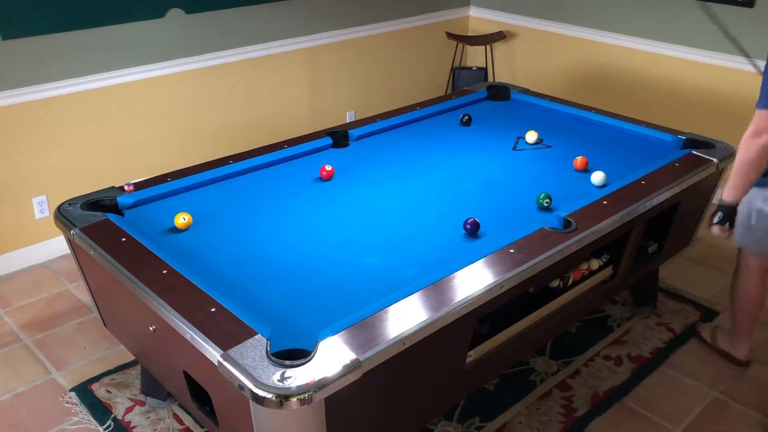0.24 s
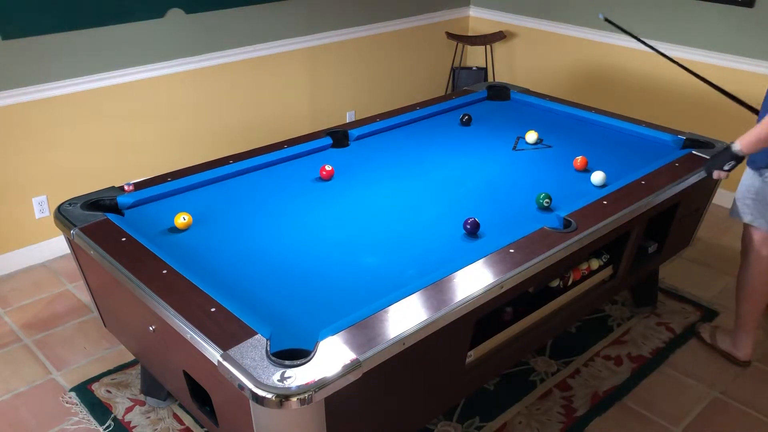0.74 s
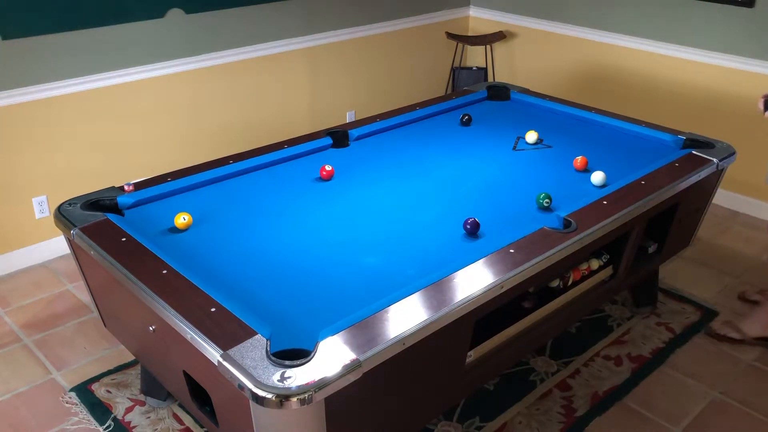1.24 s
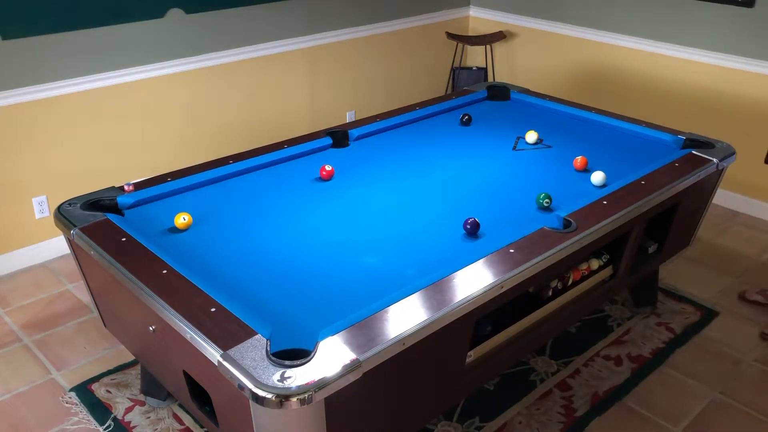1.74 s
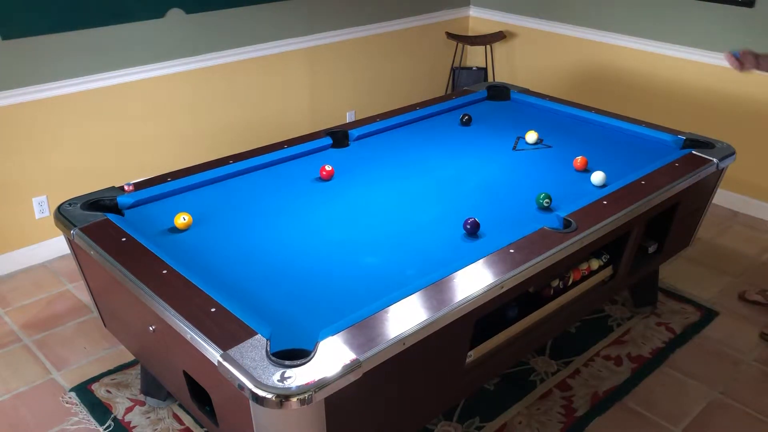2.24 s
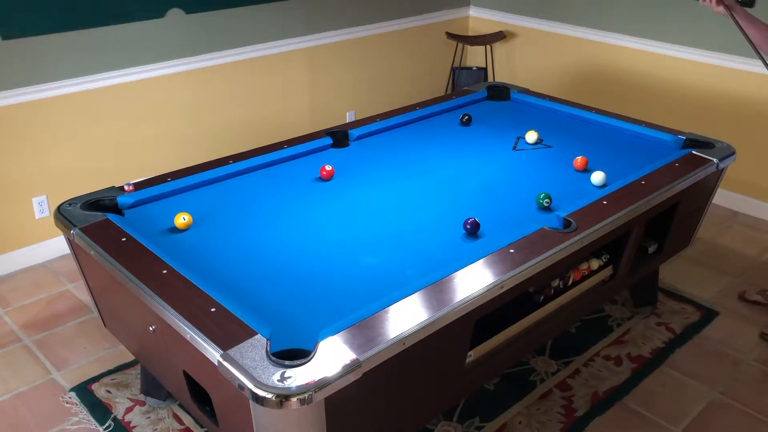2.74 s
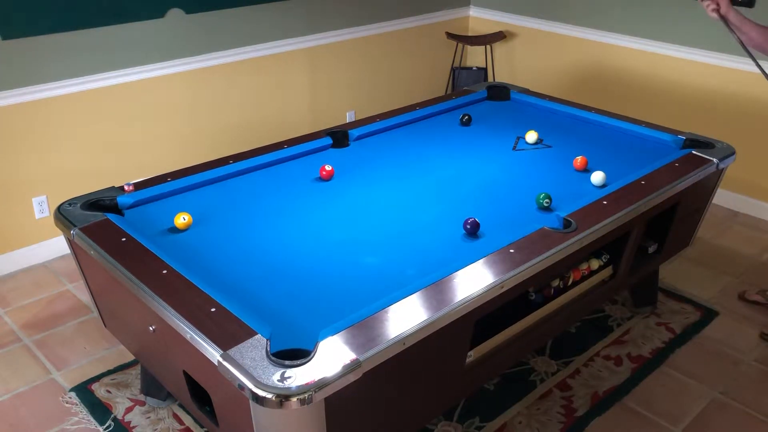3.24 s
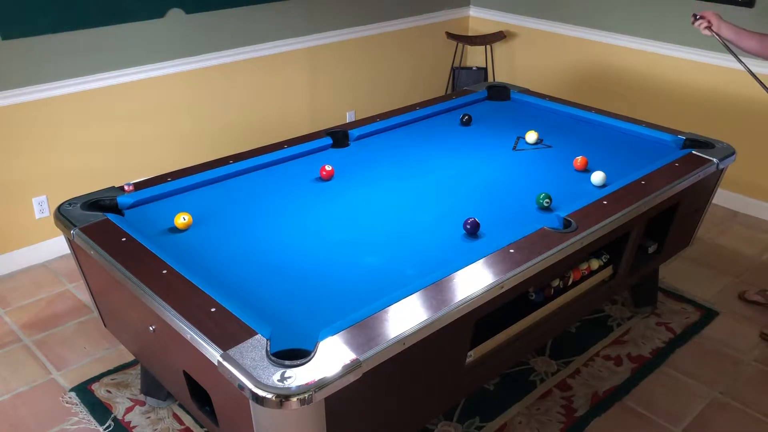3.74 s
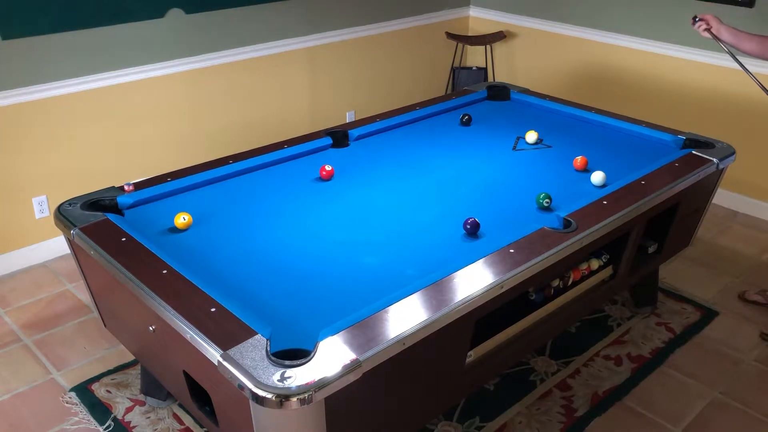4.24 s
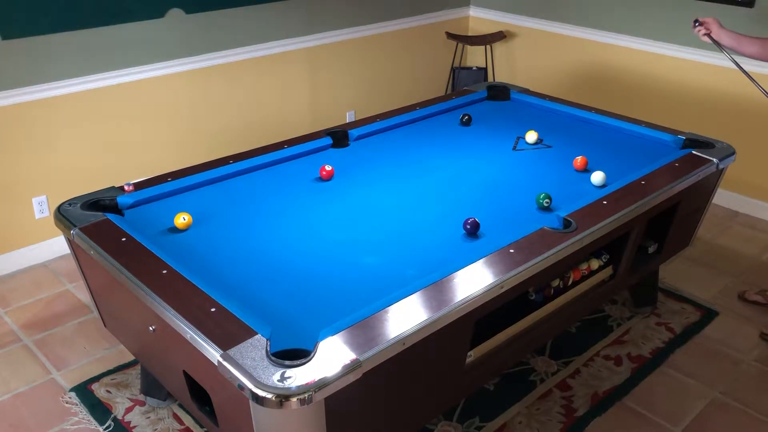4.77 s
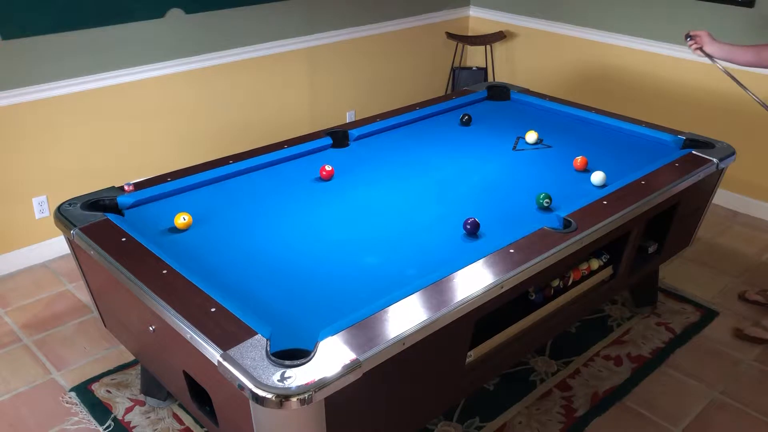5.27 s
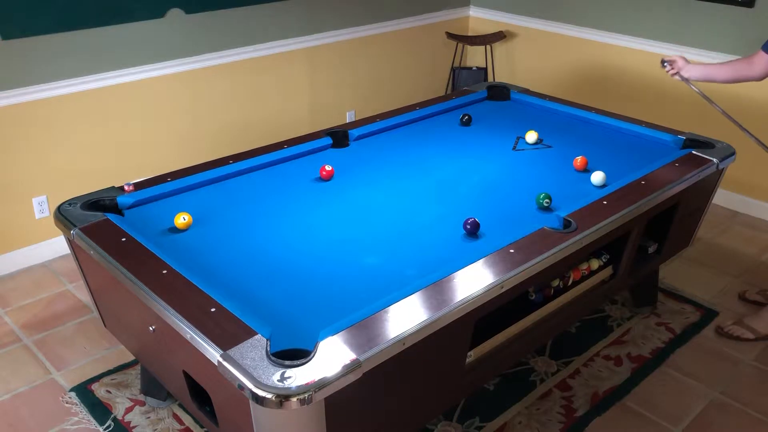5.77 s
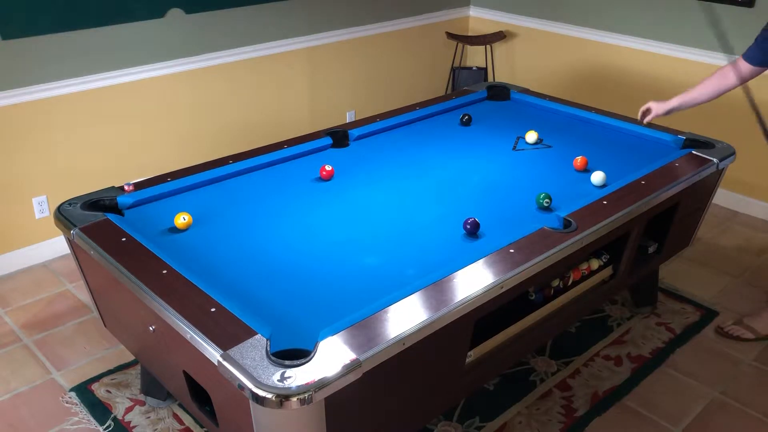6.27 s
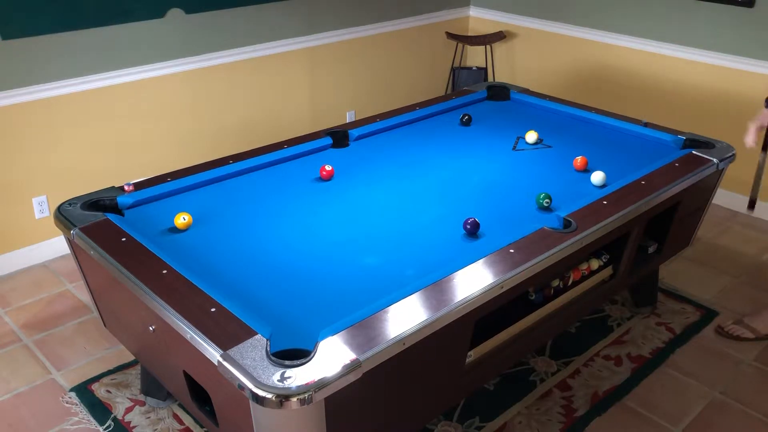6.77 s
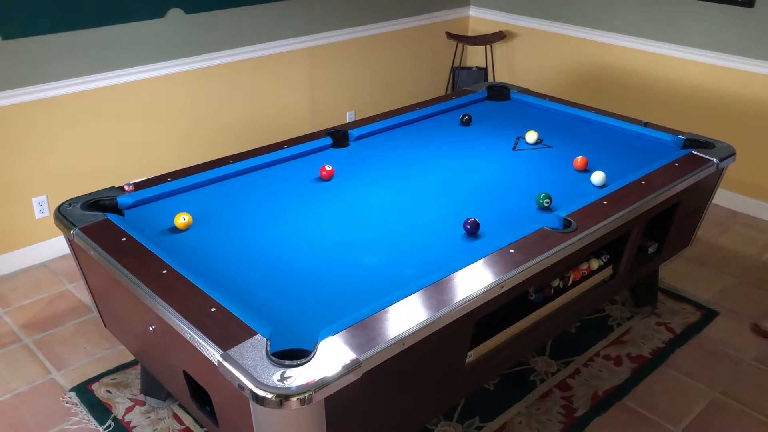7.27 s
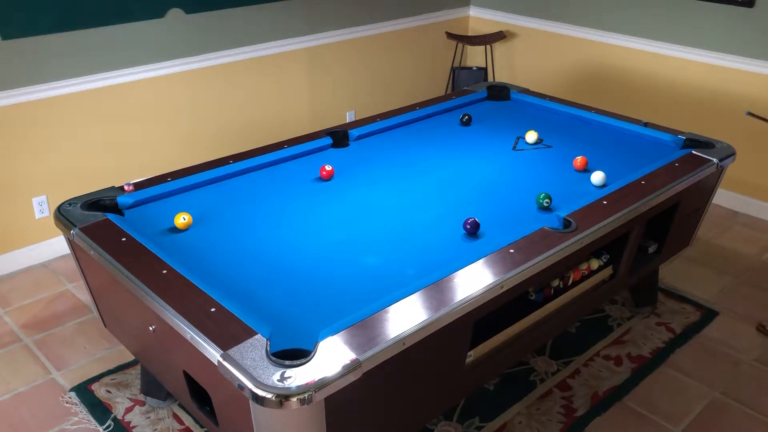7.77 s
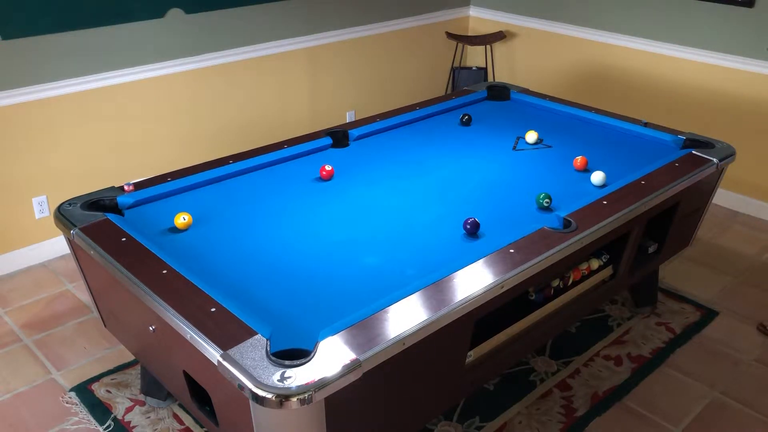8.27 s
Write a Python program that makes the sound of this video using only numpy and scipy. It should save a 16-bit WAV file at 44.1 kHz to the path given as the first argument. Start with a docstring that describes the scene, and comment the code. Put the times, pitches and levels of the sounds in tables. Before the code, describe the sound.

A ball trundles and knocks through a pool table's return track in a tiled room, followed by squeaky cue chalking, small taps and faint scuffing.

```python
"""A clack and a rumble: a ball trundles down the return track inside a coin pool table, hitting other balls.
Bumpy noise through the ringing of cabinet and track makes the roll; short noise bursts make the blows.
Unsteady tones make the guide rails whine and squeal. Then a chalk cube is twisted on a cue tip (hiss and
a woody tone), the cue taps and sandals scuff the tiles. A hard tiled room rings, over a faint appliance hum."""
import sys
import numpy as np
from scipy import signal
from scipy.fft import rfft, irfft, next_fast_len
from scipy.io import wavfile
from scipy.ndimage import map_coordinates

SR = 44100
rng = np.random.default_rng(int(sys.argv[2]) if len(sys.argv) > 2 else 0)


def ratio(d):
    """dB to gain"""
    e = np.asarray(d, float) / 20
    return 10 ** e


def store_pcm(level_fs):
    """Save levels as 16-bit WAV."""
    pcm = np.round(np.clip(level_fs, -1, 1) * 32767).astype(np.int16)
    wavfile.write(sys.argv[1], SR, np.atleast_2d(pcm).T)


N = 375291  # length in samples

# Levels are those before the final mix. A "stroke" is: start t/s, length t/s, first level/dB, last level/dB.
# how fast the room's echoes die, before each sound's stretch: (f/Hz, time to lose 60 dB t/s)
ROOM_DECAY = [(60, 1.45), (250, 0.62), (700, 0.73), (2000, 0.66), (5000, 0.51), (12000, 0.27)]
# shape of the quiet room's noise: (f/Hz, level/dB per Hz)
AIR_SPECTRUM = [(15, -46.5), (25, -21.5), (96, -3.5), (190, -14.5), (235, -12.5), (317, -17), (353, -13),
                (488, -14.5), (675, -20), (2820, -33), (4010, -29), (5110, -34.5), (6010, -33),
                (15900, -38.5)]
# appliance hum, sounded at 0.99 times the listed pitch: (f/Hz, level/dB, size of the pitch waver f/Hz)
HUM_TONES = [(60.3, -69.5, 6.2), (97, -72, 7.93), (226, -75.5, 5.54), (351, -74.5, 6), (4010, -87, 10)]

# sandal scuffs: (stroke, level/dB of the sole's tone against the hiss)
SCUFF_STROKES = [(6.37, 0.035, -61.5, -68.5, 12.5), (6.545, 0.042, -67, -66, 12.5),
                 (6.92, 0.091, -73, -60.5, 5), (7.05, 0.31, -70, -62, -5), (7.87, 0.21, -73.5, -85, 0),
                 (8.275, 0.028, -59, -63, 5.5), (8.4, .11, -81, -80, 7)]
# resonances of the sole: (f/Hz, width f/Hz, level/dB)
SOLE_MODES = [(735, 93, -1), (1540, 1500, 9)]
# cue and sandal taps: (t/s, tap level/dB, pitch f/Hz, thud level/dB and tick level/dB against the tap)
TAP_EVENTS = [(5.332, -46, 1260, -10.5, -21), (5.811, -54, 1270, -24, -26), (6.378, -46, 1230, -1.5, -34),
              (6.55, -55.5, 2060, -15, -11), (7.017, -60, 1640, -23, -9), (7.17, -58.5, 1690, -12, -11),
              (7.348, -50.5, 1090, -13, -19), (7.386, -39, 1480, -11, -32), (7.982, -73, 1140, -9, -12),
              (8.02, -73, 2100, -6.5, -22), (8.282, -59, 1460, -13, -7.5), (8.447, -65, 1450, -16, -10)]
# chalk twists and the faint turns back: (stroke of hiss, level/dB of the woody tone against the hiss)
CHALK_STROKES = [(3.1, 0.17, -61, -61, -12), (3.335, .11, -54, -53.5, -6), (3.52, 0.21, -69, -60, -3.5),
                 (3.7, 0.13, -56.5, -57, -2.5), (4.06, 0.17, -56.5, -54.5, -4.5),
                 (4.36, 0.15, -62, -70.5, -21), (4.555, .2, -58.5, -53.5, -4), (4.81, 0.15, -67, -67, -11),
                 (5.0, 0.14, -59.5, -51, -3.5), (5.22, 0.041, -60, -63, 3.5), (5.32, 0.088, -69, -51.5, -2),
                 (5.565, 0.1, -52, -49.5, -4.5), (5.81, 0.074, -54.5, -45.5, -7.5),
                 (6.02, 0.14, -68, -78.5, 9)]
# shape of the dry rubbing hiss: (f/Hz, level/dB per Hz)
HISS_SPECTRUM = [(1060, -25), (1800, 2), (1880, -10), (3080, -3), (4820, -0.5), (6000, -3), (9290, -0.5),
                 (10600, -4), (13700, -6), (15900, -9)]
# resonances of the cue's wood: (f/Hz, width f/Hz, level/dB)
CUE_MODES = [(1040, 300, -3), (1270, 44, 3), (1510, 98, 1), (2070, 440, -4.5), (2620, 330, -13.5)]
# chalk gripping the tip: (stroke, f/Hz at its loudest)
SQUEAK_STROKES = [(3.365, .13, -51, -64, 642), (3.72, .13, -56, -63, 634)]
# the squeak's overtones: (multiple, level/dB)
SQUEAK_OVERTONES = [(1, 0), (2, 4), (3, -10), (4, -5)]

# a plate left ringing, sounded at 0.98 times the listed pitch: (stroke, f/Hz at its loudest)
PLATE_STROKE = (1.9, .4, -62, -75, 2218)
# metal fittings shaken by the blows: (stroke)
JINGLE_STROKES = [(0.632, .08, -62, -68), (1.03, .26, -62, -62), (1.299, .21, -45, -52)]
# resonances of the fittings: (f/Hz, width f/Hz, level/dB)
FITTING_MODES = [(8200, 1100, 1), (10040, 350, 2), (11800, 380, -13), (13800, 400, -4), (15000, 540, -6)]

# rail whine: (t/s, f/Hz, level/dB)
WHINE_PATH = [(0.15, 4050, -63), (0.3, 3910, -57), (0.5, 3820, -61), (0.7, 3790, -68), (0.95, 3780, -63),
              (1.12, 3850, -62), (1.28, 3990, -63)]
# the whine and its octave: (multiple, level/dB)
WHINE_OVERTONES = [(1, -1), (2, -7.5)]
# rail squeals: (stroke, f/Hz at its loudest)
SQUEAL_STROKES = [(2.26, .3, -72, -57, 4780), (2.96, .24, -66, -57, 4640), (3.45, .2, -61, -65, 4735),
                  (4.275, .25, -60, -76, 4680)]
# the squeal's overtones: (multiple, level/dB)
SQUEAL_OVERTONES = [(1, -2), (2, -17.5)]
# slip rate under the squeal, heard in its upper overtones alone: (stroke, slip rate f/Hz)
SLIP_STROKES = [(2.36, .19, -84, -69, 600), (2.61, .17, -70, -86, 598)]
# those upper overtones: (multiple of the slip rate, level/dB)
SLIP_OVERTONES = [(7, -9), (9, -0.5), (10, 5.5), (11, 1), (14, -7), (16, -25)]
# the squeal breaks up into a rasp: (stroke)
RASP_STROKES = [(2.625, .17, -58, -65)]
# resonances of the rasp: (f/Hz, width f/Hz, level/dB)
RASP_MODES = [(4380, 83, 4), (4630, 86, -5), (4630, 69, 2), (8800, 270, -17)]
# the guide creaks: (stroke, f/Hz at its loudest)
CREAK_STROKE = (2.49, .27, -46, -58, 643)
# the creak's overtones: (multiple, level/dB)
CREAK_OVERTONES = [(1, 0.5), (2, -13), (3, -13.5), (4, -24)]
# a low moan as the ball slows: (stroke, f/Hz)
MOAN_STROKES = [(3.53, .17, -48, -54, 590), (3.72, .05, -50, -48, 625)]

# dry little ticks, heard up to 4 ms before the listed time: (t/s, level/dB, centre f/Hz, width f/Hz)
TICK_EVENTS = [(0.366, -64, 6470, 5000), (0.966, -72.5, 11000, 6920), (1.02, -51, 10100, 7900),
               (2.361, -69.5, 2450, 1200), (2.418, -72, 2780, 900), (3.3, -67.5, 2820, 1300),
               (7.331, -74, 2700, 398)]
# heavy drops set the floor booming: (stroke)
BOOM_STROKES = [(0.0, 0.11, -37, -38), (1.33, .12, -41, -42.5), (2.86, 0.19, -56, -49), (8.3, .2, -65, -58)]
# the room's lowest resonance: (f/Hz, width f/Hz, level/dB)
FLOOR_MODES = [(65.9, 4.1, 0)]
# ball blows: (t/s, level/dB of the boards, pitch of the struck board f/Hz,
#              clack level/dB and crack level/dB against the boards)
BLOW_EVENTS = [(0.004, -34.5, 746, -1.5, -8), (0.63, -34, 1245, -21.5, -33),
               (1.201, -42.5, 483, -20, -26.5), (1.303, -27, 490, -7, -27), (1.332, -30.5, 450, -5, -4),
               (1.371, -30, 471, -22, -21), (1.393, -38.5, 452, -15, -25), (1.451, -36, 463, -13, -32),
               (1.677, -22, 470, -21, -43), (2.834, -22.5, 470, -16.5, -28), (3.3, -50.5, 496, -28, -28)]
# shape of a dull thud: (f/Hz, level/dB per Hz)
THUD_SPECTRUM = [(40, -43), (70, -16.5), (150, -5), (300, 0), (450, -5.5), (800, -62)]
# shape of a knock: (f/Hz, level/dB per Hz)
KNOCK_SPECTRUM = [(210, -30.5), (350, 2), (391, -18), (473, 5), (571, -12), (780, 1.5), (1180, -16.5),
                  (1270, -12.5), (3000, -17), (5000, -22), (6500, -51), (11000, -120)]
# shape of a sharp crack: (f/Hz, level/dB per Hz)
CRACK_SPECTRUM = [(1500, -33), (3000, -3.5), (5000, 14.5), (9000, -4.5), (15800, -36.5)]
# resonances of the boards, each blow varying their levels: (f/Hz, width f/Hz, level/dB)
BOARD_MODES = [(360, 15, -6), (500, 68, -0.5), (677, 97, 2), (773, 57, 5.5), (850, 27, -0.5),
               (1028, 80, -6.5), (1230, 270, -5.5), (1700, 120, -10.5), (2020, 250, -18), (2570, 71, -20),
               (3320, 67, -16.5)]

# the rolling ball, one list for each stretch: (t/s, rumble level/dB, rattle level/dB against the rumble)
ROLL_STRETCHES = [
    [(0.0, -25, -5.5), (0.25, -33.5, -21.5), (0.285, -27.5, -17), (0.44, -30.5, -25), (0.62, -45.5, -46),
     (0.648, -37, -26), (0.9, -35.5, -22), (1.19, -39, -17), (1.21, -28, -31.5), (1.296, -30, -29.5)],
    [(1.3, -26, -6), (1.33, -24.5, -7), (1.388, -18.5, -11.5), (1.582, -41, -7), (1.66, -35, -25)],
    [(1.85, -49, -14.5), (2.0, -51, -42), (2.3, -46, -32), (2.742, -52.5, -23), (2.825, -46, -31)],
    [(3.1, -47.5, -33), (3.29, -67, -8), (3.312, -54, -21), (3.404, -51.5, 1), (3.55, -67, -11),
     (4.05, -71, -9), (4.13, -66, 5.5), (4.37, -61, -25), (4.6, -73, -1)],
]
# one row for each stretch: (trough level/dB and legs level/dB against the rumble)
STRETCH_MIX = [(-8.5, -13.5), (-13.5, -13), (3, -6.5), (-7, -12)]
# resonances of the cabinet panels: (f/Hz, width f/Hz, level/dB)
PANEL_MODES = [(201, 32, -6.5), (308.6, 37, 1), (364, 42, -2), (451, 68, -3.5), (560, 117, -5.5),
               (725, 45, -10), (827, 46, -14), (984, 340, -17.5)]
# resonances of the trough: (f/Hz, width f/Hz, level/dB)
TROUGH_MODES = [(231.6, 11, -0.35), (245, 17.3, -0.65)]
# resonances of the legs: (f/Hz, width f/Hz, level/dB)
LEG_MODES = [(61.2, 4, -0.45), (99.6, 19, -1), (156.7, 14, 0)]
# loose parts of the track ringing: (f/Hz, width f/Hz, level/dB)
RATTLE_MODES = [(1240, 170, 7), (1630, 300, 2), (2060, 340, -5), (2700, 72, -3), (3500, 850, -6),
                (4320, 630, -28), (5650, 300, -15.5), (6850, 710, -28)]
# thin metal strips of the track, ringing sharply within the rattle: (f/Hz, width f/Hz, level/dB)
STRIP_MODES = [(2115, 27, 1), (2324, 100, -1), (2714, 53, 0), (3810, 45, 0), (4234, 87, -4), (4733, 35, -4),
               (5020, 28, -6), (5360, 37, -9), (6400, 31, -14), (6600, 47, -9)]


def unit(x):
    """Scale to an average (rms) size of 1."""
    return x / np.sqrt(np.mean(x ** 2) + 1e-20)


def along(points, hz):
    """Read a table of (f/Hz, value) at any frequency, on a log axis."""
    f, value = np.transpose(points)
    return np.interp(np.log(hz + 1), np.log(f + 1), value)


def curves(rows):
    """One value per sample for each column after the time."""
    s, *columns = np.transpose(rows)
    t = np.arange(N) / SR
    return [np.interp(t, s, column) for column in columns]


def sounding(rows, fade=.02):
    """1 between the first and last row, with soft edges fade seconds long."""
    t = np.arange(N) / SR
    return np.clip(np.minimum(t - rows[0][0], rows[-1][0] - t) / fade, 0, 1)


def wobble(rate):
    """A smooth random curve through rate random points a second."""
    points = rng.standard_normal(int(N * rate / SR) + 4)
    return map_coordinates(points, [np.arange(N) * rate / SR])


def filtered(x, response):
    """Strengthen or weaken each frequency of x as response(f/Hz) says."""
    size = next_fast_len(len(x) + 8192)
    spectrum = rfft(x, size) * response(np.fft.rfftfreq(size, 1 / SR))
    return irfft(spectrum, size)[:len(x)]


def coloured(x, spectrum):
    """Give noise the shape of a spectrum table, rms 1."""
    return unit(filtered(x, lambda hz: ratio(along(spectrum, hz))))


def resonant(x, modes):
    """Noise through steep-sided resonances whose powers add, each about 4 dB down at its width; rms 1."""
    def response(f):
        power = 0
        for centre, width, db in modes:
            detuning = (centre * centre - f * f) / (f * width + 1)
            power = power + ratio(2 * db) / (1 + detuning ** 2) ** 1.313
        return np.sqrt(power)
    return unit(filtered(x, response))


def gritty(rate, depth_db):
    """Noise whose size swings at random, as bumps and grit pass."""
    return rng.standard_normal(N) * ratio(depth_db * wobble(rate))


def dying(noise, stretch):
    """One second of noise in which each frequency dies at the room's speed, slowed by stretch."""
    hz, t, z = signal.stft(noise, SR, nperseg=256)
    t60 = stretch * along(ROOM_DECAY, hz)
    return signal.istft(z * ratio(-60 * t / t60[:, None]), SR, nperseg=256)[1][:SR]


def strike(out, s, body, crack, rise, direct_db, stretch):
    """A blow across the room: crack first, then a body that builds up by rise (s) and dies away."""
    t = np.arange(SR) / SR
    direct = ratio(direct_db - 60 * t / 0.024)  # the extra strength at the start is lost within milliseconds
    body = dying(body, stretch) * (1 - np.exp(-t / rise)) * (1 + 0.4 * direct)
    crack = dying(crack, stretch) * (1 + direct)
    start = round(s * SR)
    lead = min(start, round(.004 * SR))  # the crack comes up to 4 ms early
    room_left = len(out) - SR - start
    out = out + np.pad(body, (start, room_left))
    return out + np.pad(crack, (start - lead, room_left + lead))


def whistle(hz, levels, partials, waver_hz, flutter_db=3.0):
    """An unsteady tone with overtones: its pitch wavers and its level flutters."""
    turn = 2 * np.pi * np.cumsum(hz + waver_hz * wobble(120)) / SR
    flutter = ratio(flutter_db * wobble(25))
    tones = sum(ratio(db) * np.sin(k * turn + k * k) for k, db in partials)
    return np.sqrt(2) * levels * flutter * tones


def stroke(start, length, first_db, last_db, attack, fall_db):
    """Gain of one stroke: it fades in over attack (s), moves to its last level, then loses fall_db a second."""
    t = np.arange(N) / SR - start
    db = np.interp(t, [0, length], [first_db, last_db]) - fall_db * np.clip(t - length, 0, None)
    return ratio(db) * np.sin(np.pi / 2 * np.clip(t / attack, 0, 1)) ** 2


def shaken(rows, modes, rate, attack, fall_db):
    """Gritty noise in a set of resonances under a few strokes."""
    gain = sum(stroke(*row, attack, fall_db) for row in rows)
    return gain * resonant(gritty(rate, depth_db=1.5), modes)


def rubbing(rows, modes, attack, fall_db):
    """Dry hiss of rubbing plus the tone of the rubbed body."""
    gains = np.array([stroke(*row[:-1], attack, fall_db) for row in rows])
    hiss = coloured(gritty(rate=340, depth_db=1.5), HISS_SPECTRUM) * ratio(1.5 * wobble(25))
    tone = resonant(gritty(rate=180, depth_db=4.0), modes)
    tone_gain = ratio([row[-1] for row in rows]) @ gains
    return gains.sum(axis=0) * hiss + tone_gain * tone


def slip_tone(row, partials, waver_hz, attack, fall_db, sag_hz=0):
    """A stick-slip tone, as surfaces grip and let go; pitch drops by sag_hz per dB lost, at most about 30 dB."""
    *shape, hz = row
    gain = stroke(*shape, attack, fall_db)
    lost_db = 20 * np.log10(gain.max() / np.maximum(gain, gain.max() / 30))
    return whistle(hz - sag_hz * lost_db, gain, partials, waver_hz)


def background():
    """Room air as shaped noise, and an appliance hum of wavering tones."""
    hum = sum(whistle(np.full(N, hz), ratio(db), [(0.99, 0)], waver_hz) for hz, db, waver_hz in HUM_TONES)
    return ratio(-64.5) * coloured(rng.standard_normal(N), AIR_SPECTRUM) + hum


def scuffs():
    """Sandals rub the tiles: dry hiss and the sole's own tone."""
    return rubbing(SCUFF_STROKES, SOLE_MODES, attack=0.0081, fall_db=140)


def taps():
    """Light taps of cue and sandals: a broad ring, a soft thud and a tick."""
    out = np.zeros(N + SR)
    for s, db, hz, thud_db, tick_db in TAP_EVENTS:
        ring_noise, thud_noise, tick_noise = rng.standard_normal((3, SR))
        ring = resonant(ring_noise, [(580, 150, -1.5), (hz, 600, 0)])
        body = ring + ratio(thud_db) * coloured(thud_noise, THUD_SPECTRUM)
        tick = ratio(tick_db) * coloured(tick_noise, CRACK_SPECTRUM)
        out = strike(out, s, ratio(db) * body, ratio(db) * tick, rise=.002, direct_db=7, stretch=.9)
    return out[:N]


def chalk():
    """Twists of the cube rub the tip and sound the cue's wood; the gripping chalk squeaks."""
    out = rubbing(CHALK_STROKES, CUE_MODES, attack=.06, fall_db=150)
    for row in SQUEAK_STROKES:
        out += slip_tone(row, SQUEAK_OVERTONES, waver_hz=11, attack=.008, fall_db=200, sag_hz=.4)
    return out


def loose_metal():
    """Metal fittings jingle as shaken noise, and a plate is left ringing as a tone."""
    jingle = shaken(JINGLE_STROKES, FITTING_MODES, rate=82, attack=.006, fall_db=147)
    return jingle + slip_tone(PLATE_STROKE, [(0.98, 0)], waver_hz=14, attack=0.024, fall_db=200, sag_hz=1.2)


def rails():
    """Stick-slip tones where the ball rubs its guides: whine, squeal, rasp, creak and moan."""
    hz, db = curves(WHINE_PATH)
    whine_gain = ratio(db) * sounding(WHINE_PATH)
    out = whistle(hz, whine_gain, WHINE_OVERTONES, waver_hz=55, flutter_db=3.5)
    out += shaken(RASP_STROKES, RASP_MODES, rate=44, attack=0.034, fall_db=120)
    for row in SQUEAL_STROKES:  # the weaker the grip, the lower the squeal
        out += slip_tone(row, SQUEAL_OVERTONES, waver_hz=36.7, attack=0.012, fall_db=130, sag_hz=5)
    for row in SLIP_STROKES:
        out += slip_tone(row, SLIP_OVERTONES, waver_hz=4.6, attack=.02, fall_db=200)
    out += slip_tone(CREAK_STROKE, CREAK_OVERTONES, waver_hz=9.3, attack=0.078, fall_db=300, sag_hz=0.89)
    for row in MOAN_STROKES:
        out += slip_tone(row, [(1, 0)], waver_hz=29.66, attack=0.029, fall_db=154)
    return out


def ticks():
    """Dry little ticks: noise around one pitch, all crack and no body."""
    out = np.zeros(N + SR)
    for s, db, hz, width_hz in TICK_EVENTS:
        tick = ratio(db) * resonant(rng.standard_normal(SR), [(hz, width_hz, 0)])
        out = strike(out, s, np.zeros(SR), tick, rise=.002, direct_db=11.5, stretch=.7)
    return out[:N]


def floor_boom():
    """Heavy drops set off the room's lowest resonance."""
    return shaken(BOOM_STROKES, FLOOR_MODES, rate=10, attack=.02, fall_db=69)


def blows():
    """Each blow: a thud of the cabinet, a knock of its boards, a clack and crack of ball on ball."""
    out = np.zeros(N + SR)
    for s, db, hz, clack_db, crack_db in BLOW_EVENTS:
        knock_noise, thud_noise, crack_noise, board_noise, clack_noise = rng.standard_normal((5, SR))
        changes = 2 * rng.standard_normal(len(BOARD_MODES))  # dB, new for each blow
        struck = [(f, width, level + change) for (f, width, level), change in zip(BOARD_MODES, changes)]
        body = resonant(board_noise, struck + [(hz, 170, 6)])
        body += ratio(-7.5) * coloured(knock_noise, KNOCK_SPECTRUM)
        body += ratio(-5.5) * coloured(thud_noise, THUD_SPECTRUM)
        crack = ratio(crack_db) * coloured(crack_noise, CRACK_SPECTRUM)
        crack += ratio(clack_db) * resonant(clack_noise, [(2200, 930, 0)])
        out = strike(out, s, ratio(db) * body, ratio(db) * crack, rise=0.0009, direct_db=7, stretch=1.1)
    return out[:N]


def roll():
    """The ball's bumpy path drums the cabinet panels, the trough and the legs, and shakes the loose track."""
    panels = resonant(gritty(rate=40, depth_db=3), PANEL_MODES)
    trough = resonant(gritty(rate=30, depth_db=2.5), TROUGH_MODES)
    legs = resonant(gritty(rate=21, depth_db=1.0), LEG_MODES)
    rattle = resonant(gritty(rate=150, depth_db=4), RATTLE_MODES)
    rattle += ratio(-4.5) * resonant(gritty(rate=60, depth_db=6), STRIP_MODES)
    out = np.zeros(N)
    for rows, (trough_db, legs_db) in zip(ROLL_STRETCHES, STRETCH_MIX):
        rumble_db, rattle_db = curves(rows)
        parts = panels + ratio(trough_db) * trough + ratio(legs_db) * legs + ratio(rattle_db) * rattle
        out += ratio(rumble_db) * parts * sounding(rows, fade=0.0022)
    return out


def scene():
    """Running sounds reach the listener directly and by way of the walls; blows carry their own echoes."""
    running = roll() + rails() + loose_metal() + chalk() + scuffs()
    tail = dying(rng.standard_normal(SR), stretch=0.92)
    walls = signal.fftconvolve(running, tail / np.linalg.norm(tail))[:N]
    mix = ratio(-2.0) * running + ratio(-6.5) * walls
    mix += blows() + floor_boom() + ticks() + taps() + background()
    return mix[None]


def band_limit(x):
    """A steep low-pass at the top of the band."""
    return signal.sosfilt(signal.butter(12, 16510, fs=SR, output="sos"), x)


def record(dry):
    """Turns everything from 15800 Hz up down by 27 dB and finishes the mix."""
    finished = filtered(dry[0], lambda hz: np.where(hz < 15800, 1, ratio(-27)))[None]
    return band_limit(finished)


dry = scene()
out = record(dry)
store_pcm(out)
```